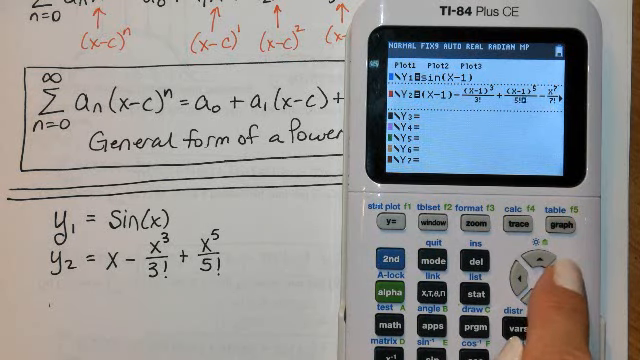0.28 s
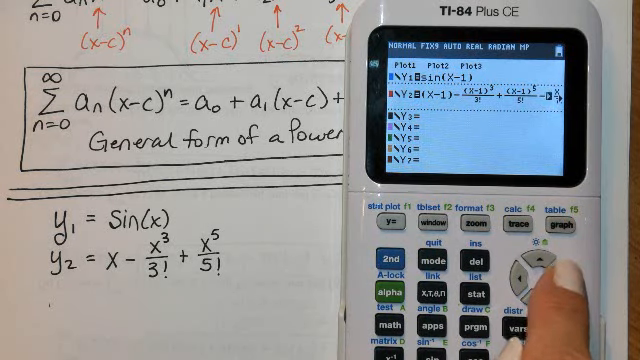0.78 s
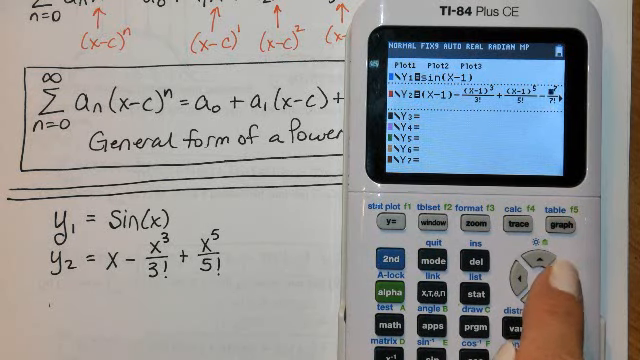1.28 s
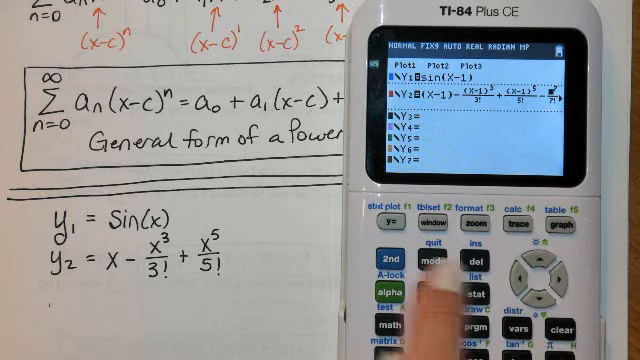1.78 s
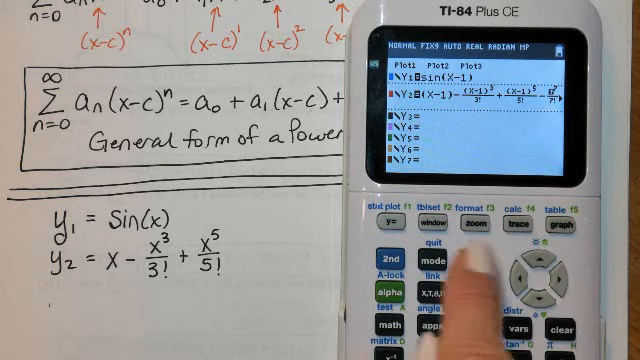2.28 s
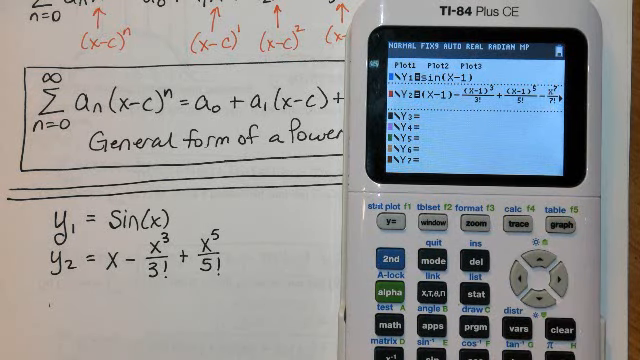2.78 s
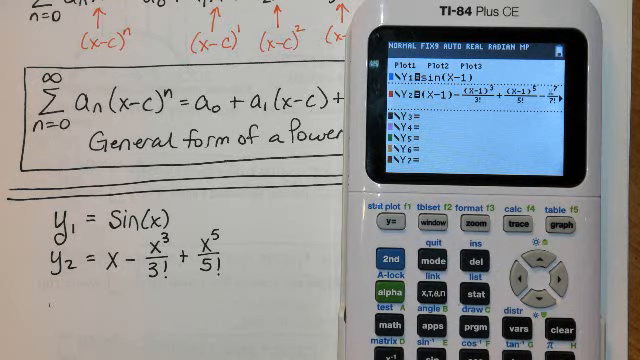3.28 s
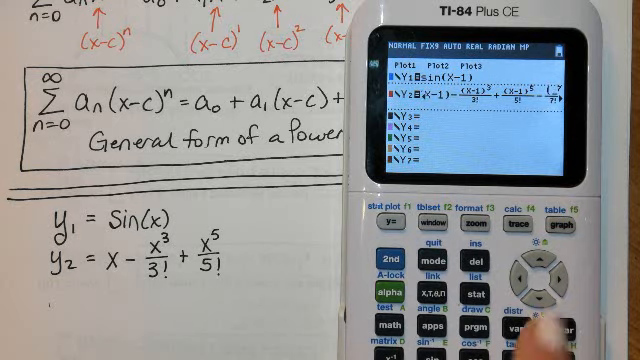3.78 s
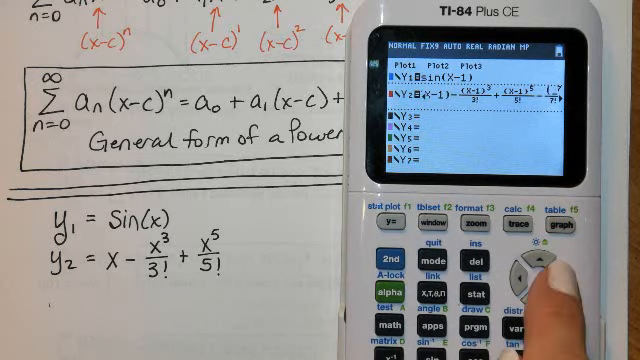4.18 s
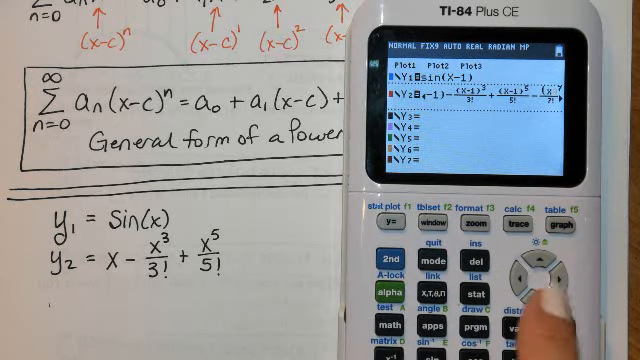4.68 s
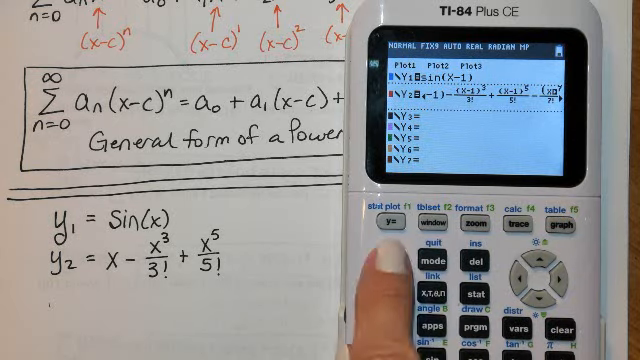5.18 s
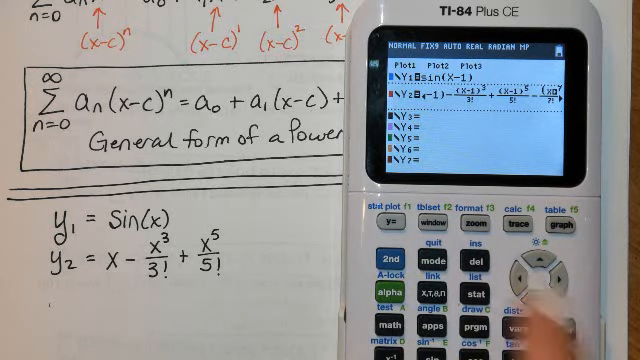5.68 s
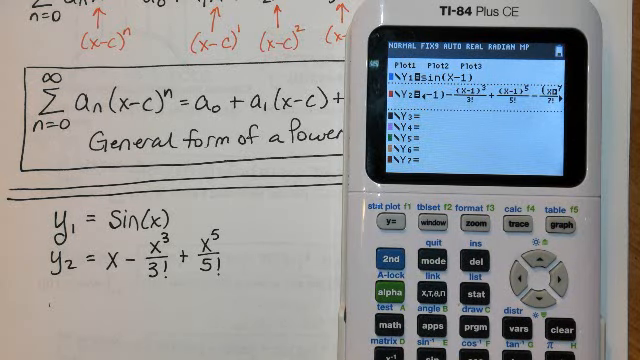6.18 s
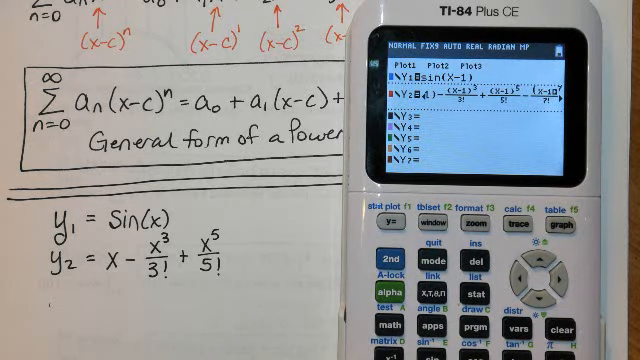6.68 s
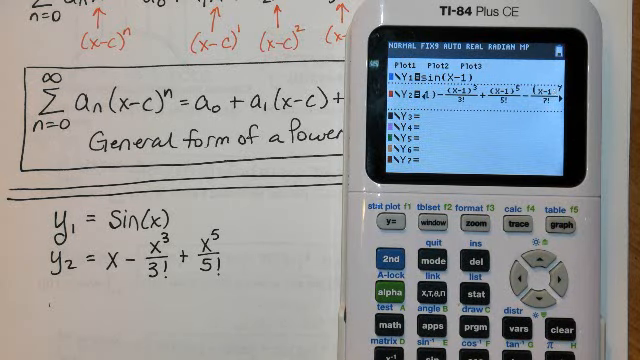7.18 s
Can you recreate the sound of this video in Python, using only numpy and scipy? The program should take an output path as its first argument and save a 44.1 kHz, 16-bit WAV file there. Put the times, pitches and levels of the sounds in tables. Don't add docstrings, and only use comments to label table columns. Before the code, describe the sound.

Dry, bright button snaps and tiny nail ticks with soft desk thuds, unevenly spaced in a quiet room with a low humming rumble.

```python
import sys
import numpy as np
from scipy import signal
from scipy.fft import rfft, irfft
from scipy.io import wavfile
from scipy.ndimage import uniform_filter1d

SR = 44100
rng = np.random.default_rng(int(sys.argv[2]) if len(sys.argv) > 2 else 0)


def attenuation_scalar(level_db):
    decades = np.asarray(level_db, float) / 20
    return 10 ** decades


def int16_out(signal):
    q = np.round(np.clip(np.atleast_2d(signal).T, -1, 1) * 32767)
    wavfile.write(sys.argv[1], SR, q.astype(np.int16))


N = 326727

# (frequency [Hz], level [dB per Hz])
AIR_SPECTRUM = [(41, -43.5), (70, -4), (79, -10.5), (87, -10), (103, -14.5), (161, -15.5), (196, -20.5),
                (224, -21.5), (267, -25.5), (401, -27), (651, -33), (4020, -36.5), (7200, -35),
                (9360, -68.5), (15800, -120)]
# (frequency [Hz], level [dB per Hz])
RUMBLE_SPECTRUM = [(1.5, -52), (3.5, -39.5), (7, -50), (22, -48), (27, -69), (33, -70.5), (42, -57),
                   (47, -68.5), (54, -58.5), (58, -67.5), (70, -84)]
# (time [s], length [s], peak level [dB], lowest frequency [Hz], highest frequency [Hz])
RUBS = [
    (2.255, 0.185, -53.5, 610, 1280),
    (3.587, 0.058, -50, 694, 5000),
    (4.922, 0.082, -42.5, 408, 553),
    (4.924, 0.046, -50.5, 713, 3213),
    (5.497, 0.039, -51, 760, 1110),
    (6.21, 0.05, -43.5, 3070, 5830),
    (6.727, 0.043, -51.5, 2536, 6010),
]
# (time [s], peak level [dB], pitch [Hz])
THUDS = [
    (2.272, -61, 446),
    (2.658, -52, 117),
    (4.27, -52, 119),
    (4.938, -48, 208),
    (5.471, -53.5, 247),
    (5.618, -55, 125.3),
    (6.221, -41.5, 135),
    (6.221, -47, 75),
]
# (time [s], peak level [dB], pitch [Hz])
KNOCKS = [(0.689, -40.5, 1300), (2.2, -42, 1230), (2.217, -41, 860), (2.5963, -27, 1052), (2.61, -45, 1120),
          (3.604, -44, 1450), (4.271, -37, 1053), (5.279, -39, 1380), (5.089, -48, 1366),
          (5.298, -42, 1340), (5.475, -41, 970), (5.497, -34.5, 870), (5.6346, -31, 994), (5.646, -34, 920),
          (6.232, -44.5, 1300), (6.39, -42.5, 1524), (6.58, -46.5, 1360), (6.6, -47, 1330),
          (6.745, -48.5, 1280)]
# (multiple of the pitch [ratio], level [dB], share of the 60 dB decay time [ratio])
DESK_MODES = [(.3, -15.5, .5), (.55, -8.5, 0.78), (.8, -5.5, 0.8), (1.01, 5.5, 0.88), (1.3, -2, 0.66),
              (1.65, -4.5, 1)]
# (frequency [Hz], level [dB], 60 dB decay time [s])
CAP_MODES = [(5400, -4.5, 0.0078), (5810, -4.5, .007), (6450, -3.5, 0.0038), (6830, -8.5, 0.016),
             (7106, -5, .014)]
LOWER_CAP_MODES = [(4210, 2, 0.0049), (5140, -3, 0.0067)]
CASE_MODES = [(2498, 1, 0.0067), (2986, 1, 0.017), (3620, 15, 0.0072)]
# (time [s], cap peak level [dB], cap brightness [dB per octave])
ROCKER = [
    (0.0044, -28, -21),
    (0.2434, -24, 3),
    (0.5185, -25, -6),
    (0.7663, -26, 0),
    (1.219, -30.5, 1),
    (4.4958, -37, -3.5),
]
# (time [s], cap peak level [dB], cap brightness [dB per octave], case level against cap [dB])
PRESSES = [
    (2.2013, -19.5, -0.5, -26),
    (2.598, -3.5, 19, -24),
    (5.281, -16.5, 7, -20),
    (5.6361, -9, -8, -16),
    (6.237, -35.5, -4, -18),
    (6.3898, -23, -16, -16.5),
]
# (time [s], cap peak level [dB])
TICKS = [(1.2132, -31.5), (1.252, -37.5), (1.9473, -45), (2.185, -45.5), (2.2178, -30), (2.3926, -37),
         (2.6114, -35), (4.2708, -30), (4.5097, -37), (5.0894, -30), (5.2708, -40), (5.2987, -33.5),
         (5.475, -35), (5.6449, -23.5), (6.2311, -39)]
# (time [s], cap peak level [dB], case level against cap [dB])
BRUSHES = [(0.6887, -49, -7), (2.4046, -36, -9), (2.415, -37, -9.5), (3.6094, -38.5, -3), (5.4964, -59, 12),
           (6.3967, -44.5, 0), (6.5813, -44, -5.5), (6.6017, -44.5, -5), (6.705, -45.5, -4.5),
           (6.7402, -48.5, -11), (6.7637, -49.5, -3.5)]


def level(x, db):
    return x * attenuation_scalar(db) / np.sqrt(np.mean(x ** 2))


def band(x, lo_hz, hi_hz, order=2):
    return signal.sosfilt(signal.butter(order, [lo_hz, hi_hz], "band", fs=SR, output="sos"), x)


def coloured(points):
    hz, db = np.transpose(points)
    log_hz = np.log(np.fft.rfftfreq(N, 1 / SR) + 0.0042)
    gain = attenuation_scalar(np.interp(log_hz, np.log(hz), db, left=-200, right=db[-1]))
    return irfft(rfft(rng.standard_normal(N)) * gain, N)


def fade(t, t60):
    return np.exp(-np.log(1000) * t / t60)


def peak_one(x):
    return x / np.abs(x).max()


def add(out, s, y):
    i = max(int(s * SR), 0)
    out[i:i + len(y)] += y[:N - i]


def ring(modes, t, scatter, hz_scale=1, t60_scale=1, tilt_db=0):
    hz, db, t60 = np.transpose(modes)[:, :, None]
    pitch_scatter, level_scatter = scatter[:, :len(modes), None]
    db = db + 0.75 * level_scatter + tilt_db * np.log2(hz / hz.min())
    tone = np.sin(2 * np.pi * hz * hz_scale * (1 + 0.012 * pitch_scatter) * t)
    return peak_one((attenuation_scalar(db) * tone * fade(t, t60 * t60_scale)).sum(axis=0))


def strike(body, force, lo_hz, hi_hz):
    return peak_one(band(signal.fftconvolve(body, force)[:len(body)], lo_hz, hi_hz, order=5))


def background():
    t = np.arange(N) / SR
    hiss = level(band(coloured(AIR_SPECTRUM), 96.5, 7300), -54)
    sway_db = -33 - 0.67 * t + 1.5 * np.cos(2 * np.pi * (t - 0.26) / 1.061)
    rumble = level(coloured(RUMBLE_SPECTRUM + [(76, -110)]), 0) * attenuation_scalar(sway_db)
    beat = 1 + 0.32 * np.cos(2 * np.pi * 0.919 * (t - 1.315))
    hum = level(beat * np.sin(2 * np.pi * 60.25 * t), -48)
    return hiss + rumble + hum


def room(x):
    room_t60_s, room_db = 0.17, -47
    t = np.arange(SR // 3) / SR
    tail = rng.standard_normal(len(t)) * 0.00052 ** (t / room_t60_s) * (t > 0.006)
    return x + attenuation_scalar(room_db) * signal.fftconvolve(x, tail)[:N]


def rubs():
    out = np.zeros(N)
    for s, length_s, db, lo_hz, hi_hz in RUBS:
        grit = rng.standard_normal((2, 8192))
        unevenness = attenuation_scalar(3.6 * uniform_filter1d(grit[1], size=150) * np.sqrt(150))
        y = band(grit[0] * unevenness, lo_hz, hi_hz)
        n = int(length_s * SR)
        add(out, s, attenuation_scalar(db) * np.sqrt(np.hanning(n)) * y[:n] / np.std(y) / 3)
    return out


def thuds():
    out, t = np.zeros(N), np.arange(8192) / SR
    for s, db, hz in THUDS:
        t60 = 0.17 * (hz / 100) ** -0.89
        wobble = band(rng.standard_normal(8192), 1.0 * hz, 1.004 * hz)
        y = wobble * 0.00091 ** (t / t60) * (1 - np.exp(-t / 0.0029))
        add(out, s, attenuation_scalar(db) * peak_one(y))
    return out


def knocks():
    out, t = np.zeros(N), np.arange(4096) / SR
    for s, db, hz in KNOCKS:
        y = ring(DESK_MODES, t, rng.standard_normal((2, 8)), hz, t60_scale=0.043)
        add(out, s, attenuation_scalar(db) * band(y, 180, 3500))
    return out


def snaps():
    rocker = [(s, db, -11.5, -28, tilt) for s, db, tilt in ROCKER]
    presses = [(s, db, case, -14, tilt) for s, db, tilt, case in PRESSES]
    ticks = [(s, db, -29, -16.5, -1) for s, db in TICKS]
    brushes = [(s, db, case, -7, 0) for s, db, case in BRUSHES]
    return sorted(rocker + presses + ticks + brushes)


def contact(noise, t, cap_db):
    slip_s = 0.00047 * attenuation_scalar(-0.4 * (cap_db + 19))
    force = 0.2 * noise * np.exp(-t / slip_s)
    force[0] = 1
    return force


def rattle(noise, grain_noise, t):
    grains = noise * attenuation_scalar(7.6 * uniform_filter1d(grain_noise, size=40) * np.sqrt(40))
    buzz = band(grains, 4300, 9400, order=4) + 0.35 * band(grains, 2300, 4700)
    return buzz * fade(t, 0.089) * (1 - np.exp(-t / 0.001))


def keys():
    creak_s, creak_db, case_lead_s = 0.0049, -23.5, 0.0012
    out, t = np.zeros(N), np.arange(4096) / SR
    for s, cap_db, case_db, lower_db, tilt_db in snaps():
        scatter, shake = rng.standard_normal((3, 2, 8)), rng.standard_normal((4, 4096))
        force = contact(shake[0, :512], t[:512], cap_db)
        cap = strike(ring(CAP_MODES, t, scatter[0], tilt_db=tilt_db), force, 5250, 9500)
        lower = strike(ring(LOWER_CAP_MODES, t, scatter[2]), force, 4320, 5280)
        case = strike(ring(CASE_MODES, t, scatter[1]), force, 2100, 3554)
        crack = cap + attenuation_scalar(lower_db) * lower
        add(out, s - case_lead_s, attenuation_scalar(cap_db + case_db) * case)
        creak = band(shake[2], 4500, 13000) * (t < creak_s) * np.exp(-t / creak_s)
        add(out, s - creak_s, attenuation_scalar(cap_db + creak_db) * creak)
        rattle_db = -27 - 0.17 * cap_db
        add(out, s, attenuation_scalar(cap_db) * (crack + attenuation_scalar(rattle_db) * rattle(shake[1], shake[3], t)))
    return out


def scene():
    return (room(keys() + knocks() + thuds() + rubs()) + background())[None]


def thin_out(x, size, gate_db, after_db, hold_s, top_hz):
    hz, _, z = signal.stft(x, SR, nperseg=size, noverlap=size * 3 // 4)
    power = uniform_filter1d(np.abs(z) ** 2, size=3, axis=0)
    power = uniform_filter1d(power, size=5, axis=1)
    power = np.repeat(power[1::3], 3, axis=0)[:len(hz) - 1]
    rows = len(power)
    treble = (np.abs(z[hz > 4000]) ** 2).sum(axis=0)
    click = np.clip(np.log10(treble / np.roll(treble, 4)) - 0.3, 0, 1) / 2
    memory = np.exp(-size / 4 / SR / hold_s)
    click = np.minimum(signal.lfilter([1], [1, -memory], click), 1)
    gate = np.median(power, axis=1)[:, None] * attenuation_scalar(2 * (gate_db + (after_db - gate_db) * click))
    row_hz = hz[:rows, None]
    weak = (power < gate) & (row_hz > 1350) & (row_hz < top_hz)
    z[:rows] *= np.where(weak, 0.1, 1)
    return signal.istft(z, SR, nperseg=size, noverlap=size * 3 // 4)[1][:N]


def band_limit(x):
    return signal.sosfilt(signal.butter(12, 11600, fs=SR, output="sos"), x)


def record(dry):
    x = signal.sosfilt(signal.ellip(10, 0.5, 70, 7194, fs=SR, output="sos"), dry[0])
    x = thin_out(x, size=640, gate_db=-9, after_db=2, hold_s=0.025, top_hz=6600)
    x = thin_out(x, size=2560, gate_db=-1, after_db=-0.5, hold_s=0.11, top_hz=6230)
    mirror = x * np.cos(2 * np.pi * 16000 * np.arange(N) / SR)
    x = x + attenuation_scalar(-41) * band(mirror, 9500, 13000, order=3)
    offset = -0.0054
    return band_limit(x[None] + offset)


dry = scene()
out = record(dry)
int16_out(out)
```